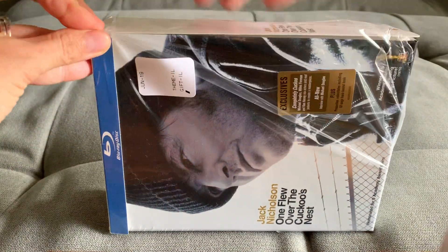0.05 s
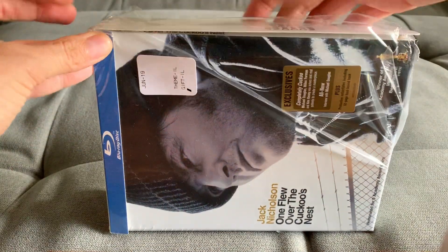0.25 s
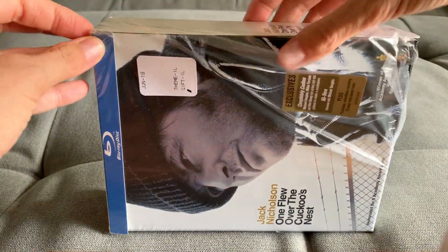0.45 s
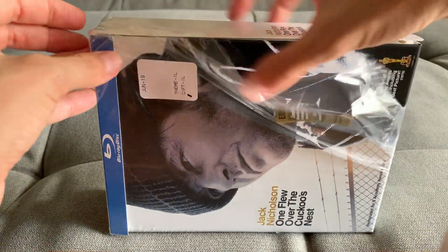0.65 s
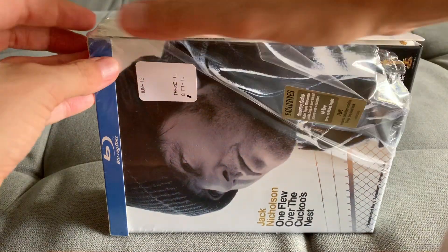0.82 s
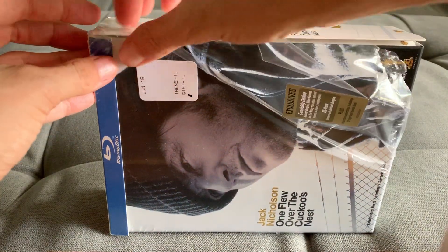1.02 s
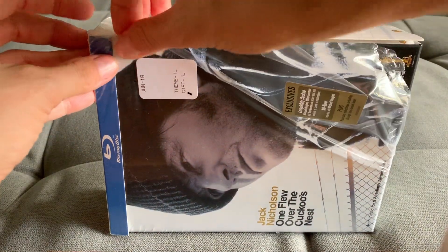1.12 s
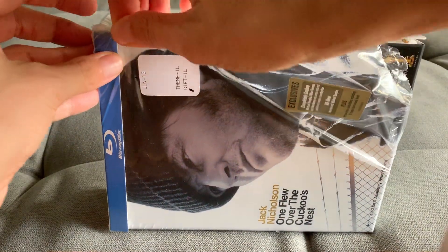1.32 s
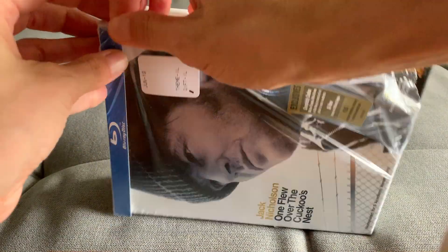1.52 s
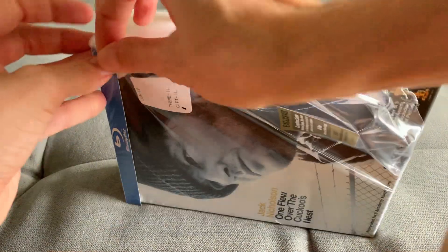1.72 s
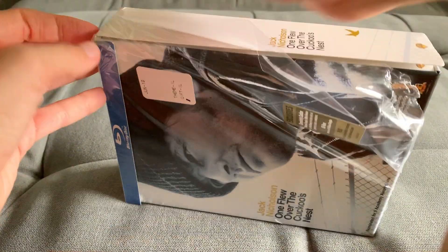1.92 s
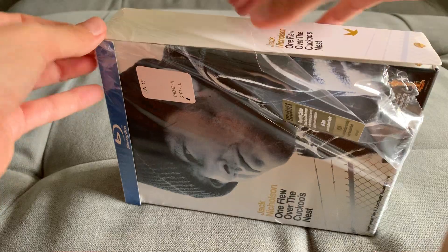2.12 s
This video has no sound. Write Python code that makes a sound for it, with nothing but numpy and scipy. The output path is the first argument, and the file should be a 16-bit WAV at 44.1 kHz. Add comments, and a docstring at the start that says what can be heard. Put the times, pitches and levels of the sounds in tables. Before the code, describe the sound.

Plastic film being torn from a hollow cardboard box, crisp uneven snaps and crinkles, heard close

```python
"""A faint rustle over a quiet rumble, then sharp snaps: shrink wrap is torn and peeled off a cardboard box.
The box stands on a cushion, close to the microphones. Snaps are clicks with a brief rattle, ringing in film and card;
rips and rustle are noise built of tiny crinkles. The hollow box knocks along, and hands bump it now and then: dying sines.
The film is to the right, so treble reaches the right microphone first. A small soft room adds reflections."""
import sys
import numpy as np
from scipy import signal
from scipy.fft import rfft, irfft, next_fast_len
from scipy.io import wavfile

SR = 44100
rng = np.random.default_rng(int(sys.argv[2]) if len(sys.argv) > 2 else 0)


def transcribe(signal):
    """Save signal, clipped to [-1, 1], as a 16-bit WAV file at the path in sys.argv[1]."""
    frames = np.atleast_2d(signal).T
    limited = np.clip(frames, -1, 1)
    pcm = np.round(limited * 32767).astype(np.int16)
    wavfile.write(sys.argv[1], SR, pcm)


N = 94815
TIME = np.arange(N) / SR
CUTOFF_HZ = 15950   # top of the sound


def from_db(db):
    """Turn decibels into a gain."""
    return 10 ** (np.asarray(db) / 20)


def rms_one(x):
    """Scale to an average strength (rms) of 1."""
    return x / np.sqrt(np.mean(x ** 2) + 1e-20)


def colour(x, points):
    """Filter through the points of a spectrum, with no sound before its cause (minimum phase)."""
    size = next_fast_len(x.shape[-1] + 4096) * 2
    hz, db = np.transpose(points)
    grid = np.maximum(np.arange(size // 2 + 1) * SR / size, 1)
    gain = from_db(np.interp(np.log(grid), np.log(hz), db))
    # folding the cepstrum forward in time gives the minimum phase
    cepstrum = irfft(np.log(gain))
    cepstrum[1:size // 2] *= 2
    cepstrum[size // 2 + 1:] = 0
    response = np.exp(rfft(cepstrum))
    return irfft(rfft(x, size) * response)[..., :x.shape[-1]]


def resonate(x, hz, q):
    """Ring at one pitch, with gain 1 at the peak; a higher q rings longer."""
    b, a = signal.iirpeak(min(hz, CUTOFF_HZ), max(q, 1), fs=SR)
    return signal.lfilter(b, a, x)


def mode(hz, t60):
    """A sine that falls 60 dB in t60 seconds: a common part and a side part a quarter turn away."""
    t = TIME[:SR // 4]
    turn = 2 * np.pi * hz * t
    fade_in = np.minimum(turn / np.pi, 1)   # lets the cosine start without a click
    side = rng.choice([-1, 1]) * np.cos(turn) * fade_in
    return from_db(-60 * t / t60) * np.array([np.sin(turn), side])


def add(track, s, sound):
    """Mix a sound into a track at time s."""
    start = int(s * SR)
    track[:, start:start + sound.shape[1]] += sound[:, :N - start]


# the film buckles; levels before the trims below:
# (time [s], film decay [s], film level [dB], film pitch [Hz], card level [dB], card pitch [Hz], box level [dB])
BUCKLES = [(0.2213, 0.0027, -42, 12500, -60.5, 3520, -92), (0.2267, 0.00088, -43, 9100, -75, 2020, -86),
           (0.2376, 0.0055, -63, 11300, -52.5, 1250, -51), (0.2794, 0.00094, -57, 11900, -61.5, 3580, -58),
           (0.3606, 0.0036, -58, 8300, -41, 1660, -43), (0.451, 0.0031, -47, 9700, -53.5, 1830, -61),
           (0.6293, 0.00074, -47, 12700, -46.5, 1780, -67), (0.6542, 0.00081, -37, 7700, -47.5, 1640, -91),
           (0.7117, 0.0019, -37.5, 9100, -50.5, 3470, -53), (0.7164, 0.00098, -37, 9600, -50.5, 1740, -53),
           (0.7301, 0.00031, -32, 11500, -53.5, 1675, -59), (0.7852, 0.0019, -33.5, 8630, -49, 2820, -48),
           (0.8244, 0.0011, -49, 9100, -51, 1950, -73.5), (1.051, 0.0027, -55.5, 9100, -59.5, 3670, -68),
           (1.1049, 0.0017, -59, 8000, -55, 960, -57.5), (1.2378, 0.00069, -49, 11500, -78, 3830, -79),
           (1.482, 0.0037, -48, 7200, -53.5, 3830, -61), (1.5002, 0.0012, -49, 10000, -60.5, 1290, -61.5),
           (1.5392, 0.0016, -40.5, 15200, -51.5, 3020, -65),
           (1.5883, 0.00074, -46.5, 9200, -56.5, 2800, -61.5), (1.816, 0.0016, -39, 8900, -54, 4320, -82),
           (1.8308, 0.0011, -43, 8900, -44.5, 4100, -57), (1.837, 0.001, -33, 8940, -32.5, 3080, -55),
           (1.87, 0.0053, -40, 10200, -41, 3900, -49.5), (2.0311, 0.00086, -65.5, 13400, -59, 1000, -57)]
# wrinkles flick over, too light to stir the box; levels before the trims: (time [s], film level [dB], card level [dB])
WRINKLES = [(0.325, -75, -68), (0.395, -73, -57.5), (0.514, -57, -64), (0.5641, -54.5, -75),
            (0.571, -58, -60), (0.616, -56, -66), (0.623, -46.5, -55), (0.674, -47.5, -59),
            (0.678, -51, -55), (0.7499, -45, -52), (0.7577, -46.5, -55), (0.762, -45, -53),
            (1.158, -69.5, -67.5), (1.2247, -64, -92), (1.2562, -58, -70.5), (1.405, -71.5, -63),
            (1.509, -58, -65), (1.5625, -53, -59.5), (1.607, -58, -77), (1.727, -47.5, -70),
            (1.732, -47.5, -55.5), (1.856, -47, -59), (1.965, -54.5, -61.5), (2.125, -70.5, -67)]
# what the hollow box rings with: (frequency [Hz], level [dB], time to fall 60 dB [s])
BOX_RINGS = [(174, -13.5, 0.048), (234, -12, 0.12), (301.5, -0.5, 0.065), (410.4, -12.5, 0.13),
             (473, -8.5, 0.0093), (696, -3, 0.01)]
# tone of a snap in the film: (frequency [Hz], level [dB])
SNAP_TONE = [(1500, -26), (4000, -12.5), (6000, -6), (7500, -5.5), (8200, -1), (12500, -3.5), (14200, -3),
             (15800, -5.5)]
# tone of the card, for snaps and rubbing alike: (frequency [Hz], level [dB])
CARD_TONE = [(250, -37.5), (600, -4.5), (950, 1), (1300, 0), (1650, 3), (1950, -2.5), (2350, -8.5),
             (2850, 1), (4200, -1.5), (6000, -3.5), (10000, -42)]
TICK_DECAY_S = 0.0007
TICK_FILM_HZ, TICK_CARD_HZ = (7500, 13000), (1500, 4590)   # each wrinkle has its own pitch within these
FILM_DB, CARD_DB, BOX_DB = 2, 1, -1   # level trims
SNAP_WINDOW_S = 0.01   # a snap has the energy of a steady sound of its level lasting this long
FILM_Q, FILM_RING, CARD_Q, CARD_RING = 8.7, 1.93, 5, 2.05   # sharpness and strength of the crease's ring
FIRST_CLICK, CARD_LINGERS = 4.1, 1.73   # size of the first click; card decay over film decay
# the rattle of a snap dies quickly and leaves a short tail
RATTLE_PER_S, RATTLE_SHAPE, RATTLE_TAIL_DB, TAIL_DECAY_S = 11000, 0.86, -4, 0.0018


def snaps():
    """A crease springs over: a click and brief rattle in film and card; the larger ones also knock the box."""
    film, card, box = np.zeros((3, 2, N))
    t = TIME[:SR // 20]

    def at_level(x, db):
        """Give each part the energy that its level asks for."""
        energy = np.sum(x ** 2, axis=1, keepdims=True)
        return x * from_db(db) * np.sqrt(SNAP_WINDOW_S * SR / energy)

    def rattle(decay_s):
        """Random clicks that die away after a first click."""
        clicks = rng.standard_normal((2, len(t))) * (rng.random(len(t)) < RATTLE_PER_S / SR) + 1e-18
        quick = np.exp(-(t / max(decay_s, 1 / SR)) ** RATTLE_SHAPE)
        tail = from_db(RATTLE_TAIL_DB) * np.exp(-t / TAIL_DECAY_S)
        x = clicks * (quick + tail)
        x[0, 0] = FIRST_CLICK   # in the common part only
        return x

    def crease(s, decay_s, film_db, film_hz, card_db, card_hz):
        """One crease cracks in the film and clacks in the card, each at its own pitch."""
        crack, clack = rattle(decay_s), rattle(decay_s * CARD_LINGERS)
        crack = crack + FILM_RING * resonate(crack, film_hz, FILM_Q)
        clack = clack + CARD_RING * resonate(clack, card_hz, CARD_Q)
        add(film, s, at_level(colour(crack, SNAP_TONE), film_db + FILM_DB))
        add(card, s, at_level(colour(clack, CARD_TONE), card_db + CARD_DB))

    for s, *buckle, box_db in BUCKLES:
        crease(s, *buckle)
        knock = 0
        for hz, db, t60 in BOX_RINGS:
            # each knock stirs the rings a little differently
            strength = rng.choice([-1, 1]) * from_db(db + rng.normal(0, 4.4))
            knock = knock + strength * mode(hz, t60)
        add(box, s, at_level(knock, box_db + BOX_DB))
    for s, film_db, card_db in WRINKLES:
        crease(s, TICK_DECAY_S, film_db, rng.uniform(*TICK_FILM_HZ), card_db, rng.uniform(*TICK_CARD_HZ))
    return film, card, box


GRAIN_DECAY_S = 0.0015   # one crinkle of the rustle


def grains(per_s, spread_db, hiss):
    """Crinkles of uneven size at random moments, each a quickly dying fizz, over a smooth hiss."""
    happens = rng.exponential(1, N), rng.random(N) < per_s / SR
    sizes = from_db(spread_db * np.minimum(happens[0], 4)) * happens[1]
    crinkle = rms_one(signal.lfilter([1], [1, -np.exp(-1 / (GRAIN_DECAY_S * SR))], sizes + 1e-18))
    return np.hypot(crinkle, hiss) * rng.standard_normal((2, N))


# loudness of the rustle, before the trims below:
# (time [s], sliding film level [dB], rubbed card level [dB], hollow box level [dB])
RUSTLE_LEVELS = [(0.0, -62.5, -78.5, -81), (0.122, -77.5, -81, -90), (0.197, -67.5, -82.5, -79),
                 (0.224, -54, -79, -63.5), (0.253, -53.5, -63.5, -61), (0.328, -69.5, -68, -82),
                 (0.361, -45.5, -47.5, -62), (0.417, -55.5, -62, -64), (0.442, -41, -55, -50),
                 (0.487, -56.5, -64, -67.5), (0.563, -43.5, -56.5, -65.5), (0.698, -51, -53.5, -63.5),
                 (0.712, -38, -47.5, -58), (0.782, -46.5, -52.5, -53.5), (0.803, -38.5, -43.5, -49),
                 (0.891, -80, -82.5, -83), (1.021, -81, -85.5, -88.5), (1.054, -53, -61.5, -71.5),
                 (1.111, -53.5, -61, -66.5), (1.122, -75.5, -69, -60), (1.211, -70, -82, -74.5),
                 (1.238, -63, -79, -75), (1.39, -60, -70.5, -75), (1.425, -72, -64.5, -73),
                 (1.469, -84, -72, -58.5), (1.481, -56.5, -62, -75), (1.591, -55, -57, -61.5),
                 (1.644, -60.5, -66, -67.5), (1.737, -48, -62.5, -74), (1.792, -67.5, -71, -85.5),
                 (1.823, -38, -59.5, -55.5), (1.857, -51.5, -48.5, -61), (1.882, -46, -49.5, -48),
                 (1.918, -49, -55.5, -67), (1.952, -55.5, -69, -77), (2.01, -75, -76.5, -84),
                 (2.035, -60, -65, -69), (2.15, -68.5, -66, -68)]
# short rips and slips of the film: (middle [s], half length [s], film level [dB], card level [dB])
FILM_RIPS = [(0.227, 0.0057, -40, -50.5), (0.438, 0.0039, -54, -48), (0.803, 0.0028, -35, -66),
             (1.734, 0.0018, -59, -67), (1.872, 0.0029, -31, -38.5), (1.895, 0.0042, -33.5, -60)]
# tone of the sliding film: (frequency [Hz], level [dB])
SLIDE_TONE = [(1500, -22), (4000, -13.5), (6000, -6), (8300, 1), (10500, -2), (12500, -3), (14200, 0.5),
              (15800, -10)]
# tone of the rubbing heard through the hollow box: (frequency [Hz], level [dB])
BOX_TONE = [(60, -5.5), (130, 1), (200, 3.5), (295, -1), (350, 5), (420, -4.5), (570, -3.5), (900, -23.5),
            (2000, -22)]
SLIDE_DB, RUB_DB, HOLLOW_DB = -4, -4.5, -1.5   # level trims
SLIDE_GRAINS_PER_S, SLIDE_SPREAD_DB, SLIDE_HISS = 500, -2, 0.59
RUB_GRAINS_PER_S, RUB_SPREAD_DB, RUB_HISS = 300, 2, 0.8


def rustle():
    """Film slides over card in dense small slips, which swell for a few milliseconds at each rip."""
    s, *levels = np.transpose(RUSTLE_LEVELS)
    trims = (SLIDE_DB, RUB_DB, HOLLOW_DB)
    film, card, box = [from_db(np.interp(TIME, s, db) + trim) for db, trim in zip(levels, trims)]
    for middle_s, half_s, film_db, card_db in FILM_RIPS:
        swell = np.exp(-((TIME - middle_s) / half_s) ** 2 / 2)
        film = np.hypot(film, from_db(film_db) * swell)
        card = np.hypot(card, from_db(card_db) * swell)
    slide = grains(SLIDE_GRAINS_PER_S, SLIDE_SPREAD_DB, SLIDE_HISS)
    rub = grains(RUB_GRAINS_PER_S, RUB_SPREAD_DB, RUB_HISS)
    sliding = film * rms_one(colour(slide, SLIDE_TONE))
    rubbing = card * rms_one(colour(rub, CARD_TONE))
    hollow = box * rms_one(colour(rub, BOX_TONE))
    return sliding, rubbing, hollow


BEND_DELAY_S = 0.0005   # travel time of the highest bending waves across the sheet


def bend(x):
    """Bending waves travel faster the higher they are, so a click becomes a brief falling chirp."""
    hz = np.arange(N + 1) * SR / (2 * N)
    turns = BEND_DELAY_S * (2 * np.sqrt(hz * CUTOFF_HZ) - hz)
    return irfft(rfft(x, 2 * N) * np.exp(-2j * np.pi * turns))[:, :N]


# hands bump the box, low through the cushion or higher on a panel: (time [s], level [dB], pitch [Hz])
HAND_BUMPS = [(0.245, -49.5, 64), (.242, -42.5, 476), (0.361, -44.5, 65.6), (0.442, -54, 56.6),
              (0.452, -51.5, 286), (.716, -50.5, 79), (0.787, -52.5, 59), (0.801, -49.5, 109.3),
              (1.128, -53.5, 58.8), (1.456, -48.5, 367), (1.484, -45, 427), (1.503, -43.5, 417),
              (1.604, -47.5, 284), (1.659, -52, 89), (1.839, -37.5, 450), (1.867, -43, 57)]
BUMP_CYCLES = 10.3   # until a bump has fallen by 60 dB


def bumps():
    """Soft contacts set the box thudding for a few cycles."""
    out = np.zeros((2, N))
    for s, db, hz in HAND_BUMPS:
        add(out, s, from_db(db) * mode(hz, BUMP_CYCLES / hz))
    return out


# the two microphones: (frequency [Hz], likeness [0-1], left over right [dB])
MICROPHONE_PAIR = [(100.4, 0.9, 3), (481, 0.93, -0.5), (796, 0.77, 6), (1504, 0.73, 4), (2200, 0.2, 2),
                   (4050, 0.55, 2), (5570, 0.56, -3), (8400, 0.92, 0)]
FILM_LAG_S, LAG_FROM_HZ = 0.000258, 2785   # the left microphone lags in the treble, above about this frequency


def microphones(x):
    """Common and side parts become left and right; treble arrives later on the left, farther from the film."""
    common, side = rfft(x, 2 * N)
    hz = np.maximum(np.arange(N + 1) * SR / (2 * N), 1)
    at_hz, *columns = np.transpose(MICROPHONE_PAIR)
    alike, left_db = [np.interp(np.log(hz), np.log(at_hz), c) for c in columns]
    alike = np.clip(alike, 0, 1)
    common = common * np.sqrt((1 + alike) / 2)
    side = side * np.sqrt((1 - alike) / 2)
    lag_s = FILM_LAG_S / (1 + (LAG_FROM_HZ / hz) ** 10)
    left = (common + side) * from_db(left_db / 2) * np.exp(-2j * np.pi * hz * lag_s)
    right = (common - side) * from_db(-left_db / 2)
    return irfft(np.array([left, right]))[:, :N]


ROOM_T60_S, ROOM_DB = 0.076, -19   # time for reflections to fall 60 dB; their level


def reflections(x):
    """A small soft room: dense dying reflections, different at each microphone."""
    t = TIME[:SR // 2]
    tail = rng.standard_normal((2, len(t))) * from_db(-60 * t / ROOM_T60_S)
    tail = tail / np.sqrt(np.sum(tail ** 2, axis=1, keepdims=True))
    return from_db(ROOM_DB) * signal.fftconvolve(x, tail, axes=1)[:, :N]


# tone of the rumble: (frequency [Hz], level [dB])
RUMBLE_TONE = [(20, 3), (120, -5.5), (300, -22), (700, -28), (2500, -41), (16000, -47.5)]
ROOM_NOISE_DB = -66.5


def room_noise():
    """Quiet rumble: low-heavy noise, mostly alike on both sides."""
    mid, side = rng.standard_normal((2, N))
    left_right = mid + 0.32 * side * [[1], [-1]]
    return from_db(ROOM_NOISE_DB) * rms_one(colour(left_right, RUMBLE_TONE))


def scene():
    """Film, card and box in a small room, over its rumble."""
    wrapping = bend(sum(snaps()) + sum(rustle()))
    direct = microphones(wrapping + bumps())
    return direct + reflections(direct) + room_noise()


PORT_NOTCH_HZ = (9560, 13800)
PORT_NOTCH_Q, PORT_NOTCH_DEPTH = 25, 0.59   # sharpness; share taken away at the centre


def record(dry):
    """The microphone ports cut two notches in the treble; the top is cut steeply."""
    for hz in PORT_NOTCH_HZ:
        dry = dry - PORT_NOTCH_DEPTH * resonate(dry, hz, PORT_NOTCH_Q)
    steep_cut = signal.ellip(10, .2, 80, CUTOFF_HZ, fs=SR, output="sos")
    return signal.sosfilt(steep_cut, dry)


dry = scene()
out = record(dry)
transcribe(out)
```